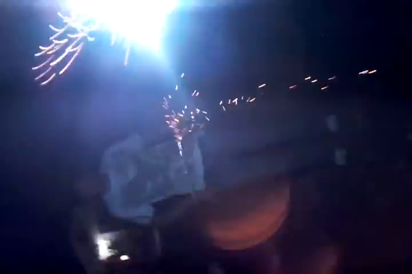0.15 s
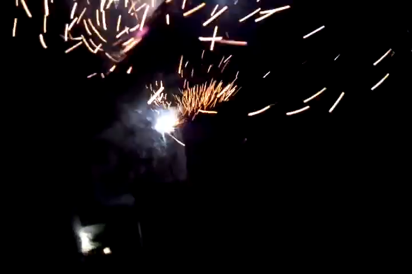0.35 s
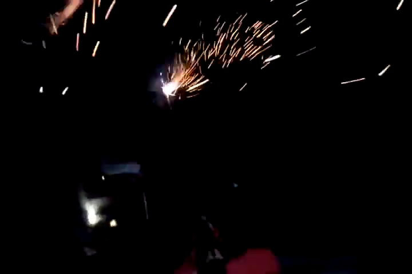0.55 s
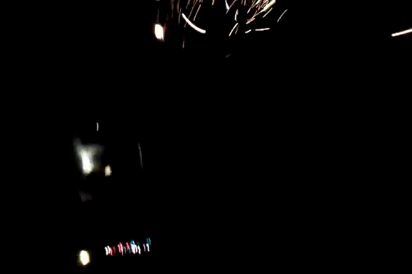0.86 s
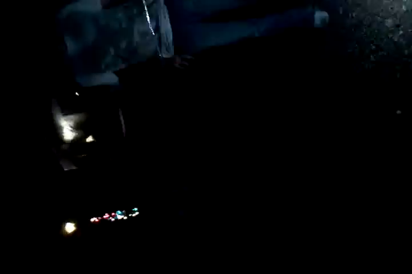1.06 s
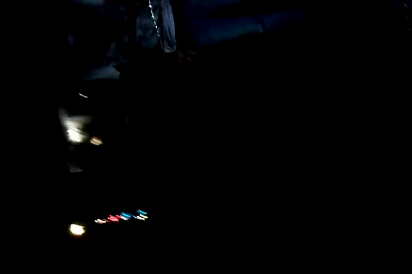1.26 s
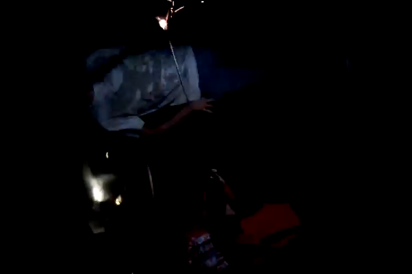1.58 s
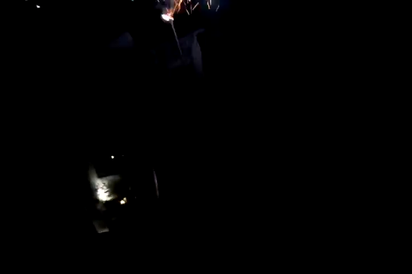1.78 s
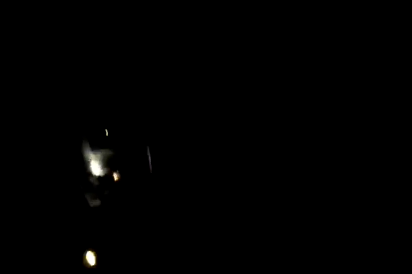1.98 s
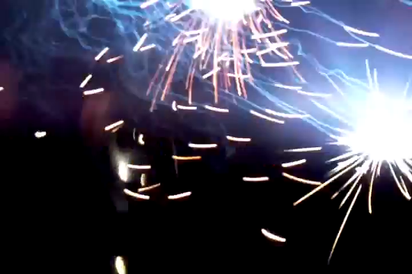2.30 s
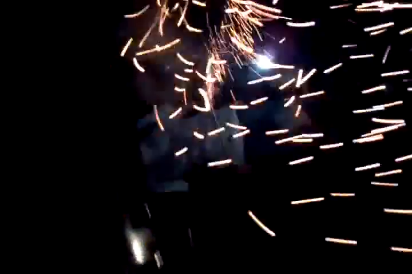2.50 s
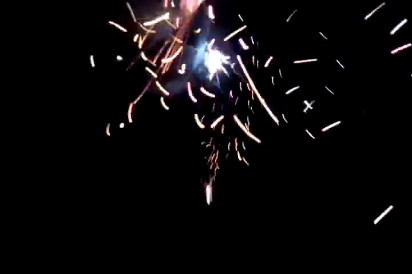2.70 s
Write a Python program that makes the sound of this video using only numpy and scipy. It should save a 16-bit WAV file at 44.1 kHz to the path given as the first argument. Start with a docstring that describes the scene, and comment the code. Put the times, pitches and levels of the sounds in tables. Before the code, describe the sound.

Small fireworks pop irregularly a few metres from a small band-limited microphone outdoors. A tight loud burst comes at 0.2-0.45 s, a strong bang at 0.57, a dense cluster at 0.7-0.95, then lighter snaps from 1.0 to 2.1. Louder cracks return at 2.15-2.3, the hardest at 2.38, then sparser pops, one strong at 2.64. Short spark sizzles and faint burning hiss and ticks continue underneath.

```python
"""An irregular crackle of small hand-held fireworks pops outdoors at night, a few metres from a small microphone.
Each pop is a pressure spike with a low thump, close reflections and a short scatter from things nearby.
Showers of sparks, made of coloured grains and noise, sizzle among the pops.
The burning stick hisses and ticks underneath, over a faint outdoor rumble of low noise."""
import sys
import numpy as np
from scipy import signal
from scipy.fft import rfft, irfft, next_fast_len
from scipy.io import wavfile
from scipy.ndimage import uniform_filter1d, map_coordinates

SR = 44100
rng = np.random.default_rng(int(sys.argv[2]) if len(sys.argv) > 2 else 0)


def wrap_up_sound(samples):
    """Save the sound to the file named by the first command line argument, as 16-bit audio."""
    columns = np.atleast_2d(samples).T
    # keep every value between -1 and 1, then stretch to whole-number steps
    tamed = np.clip(columns, -1, 1)
    steps = np.round(tamed * 32767).astype(np.int16)
    wavfile.write(sys.argv[1], SR, steps)


N = 125685


def amp(db):
    """Decibels to gain."""
    return 10 ** (np.asarray(db) / 20)


def unit(x):
    """Scale to rms 1."""
    return x / np.sqrt(np.mean(x ** 2) + 1e-20)


def unit_energy(x):
    """Scale to energy 1."""
    return x / (np.linalg.norm(x) + 1e-20)


def along(points, hz):
    """Interpolate (f/Hz, value) points on a log frequency axis."""
    f, value = np.transpose(points)
    return np.interp(np.log(hz + 1), np.log(f + 1), value)


def wobble(knots_per_s):
    """A smooth random curve through normally distributed knots."""
    knots = rng.standard_normal(int(N * knots_per_s / SR) + 4)
    return map_coordinates(knots, [np.arange(N) * knots_per_s / SR])


def coloured(x, points):
    """Filter x with the gains of (f/Hz, level/dB) points, leaving its phase alone."""
    m = next_fast_len(N + SR // 4)
    gain = amp(along(points, np.fft.rfftfreq(m, 1 / SR)))
    return irfft(rfft(x, m) * gain, m)[:N]


def resonance(f, hz, width):
    """Complex response of one resonance, 1 at its centre."""
    return 1j * f * width / (hz ** 2 - f ** 2 + 1j * f * width)


def causal(gain):
    """The spectrum of the sharpest causal pulse that has these gains (minimum phase)."""
    cepstrum = irfft(np.log(gain))
    half = len(cepstrum) // 2
    # fold the second half of the cepstrum onto the first
    cepstrum[1:half] *= 2
    cepstrum[half + 1:] = 0
    return np.exp(rfft(cepstrum))


def evened(spectrum, bins=61):
    """Reflections keep their fine ripple but add no broad colour."""
    power = uniform_filter1d(np.abs(spectrum) ** 2, bins)
    return spectrum / causal(np.sqrt(np.abs(power) + 1e-9))


def pulse(points, treble_db=0, body_db=0, size=2048):
    """A sharp pulse with this spectrum, its treble and body raised or lowered."""
    # how much of the treble setting each frequency takes: f/Hz, share [0-1]
    treble_shelf = [(2600, 0), (5000, 1)]
    # how much of the body setting each frequency takes: f/Hz, share [0-1]
    body_bell = [(380, 0), (600, 1), (950, 1), (1700, 0)]
    hz = np.fft.rfftfreq(size, 1 / SR)
    level_db = along(points, hz) + treble_db * along(treble_shelf, hz) + body_db * along(body_bell, hz)
    return irfft(causal(amp(level_db)))


def add(track, s, sound):
    """Mix a sound into the track at time s."""
    i = max(0, round(s * SR))
    part = track[i:i + len(sound)]
    part += sound[:len(part)]


def sparks(per_s, spread_db):
    """Random impulses of uneven size and either sign."""
    size = amp(spread_db * np.minimum(rng.exponential(size=N), 3))
    fires = rng.random(N) < per_s / SR
    return fires * size * rng.choice([-1, 1], N)


def scatter(size=2048):
    """Dense reflections from things nearby: a short flurry of noise with a weaker, longer tail."""
    rise_s, flurry_t60_s = 0.00042, 0.027
    tail_db, tail_t60_s = -16, 0.084  # from further away
    t = np.arange(size) / SR
    decay = amp(-60 * t / flurry_t60_s) + amp(tail_db - 60 * t / tail_t60_s)
    rise = 1 - np.exp(-t / rise_s)
    return unit_energy(rng.standard_normal(size) * rise * decay)


def night_air():
    """A faint outdoor rumble: steady noise with a low-frequency colour."""
    # colour of the rumble: f/Hz, level/dB
    rumble_colour = [(20, -5), (45, 4.5), (110, 3.5), (250, -8), (700, -32.5)]
    return amp(-70) * unit(coloured(rng.standard_normal(N), rumble_colour))


def burning():
    """The stick hisses unevenly and spits scattered ticks, both following one level curve."""
    # colour of hiss and ticks: f/Hz, level/dB
    hiss_colour = [(40, -18.5), (130, -0.5), (260, 3), (480, -2), (750, -1.5), (1100, -1.5), (2000, 2.5),
                   (2850, 1.5), (4500, -3), (6500, -2), (7200, -30.5), (9000, -61.5)]
    # level of hiss and ticks over time, with a brief dropout near 2.34 s: t/s, level/dB
    level_curve = [(0.0, -55), (0.31, -56), (0.44, -55.5), (0.65, -55), (0.75, -45), (0.98, -51.5),
                   (1.16, -55.5), (1.4, -53.5), (1.58, -53.5), (1.78, -57.5), (2.18, -54), (2.32, -48.5),
                   (2.339, -62), (2.358, -48.5), (2.53, -52.5), (2.85, -54.5)]
    hiss_db, waver_db, tick_db = -4.5, 2.1, -4.5  # hiss and ticks are set against the level curve
    hiss = unit(coloured(rng.standard_normal(N), hiss_colour))
    hiss *= amp(hiss_db + waver_db * wobble(knots_per_s=24.17))

    tick = scatter()
    tick[0] += 1  # the direct click
    ticks = signal.fftconvolve(sparks(per_s=260, spread_db=9), tick)[:N]
    ticks = amp(tick_db) * unit(coloured(ticks, hiss_colour))

    level_db = np.interp(np.arange(N) / SR, *np.transpose(level_curve))
    return amp(level_db) * (hiss + ticks)


def yard(x, count=12):
    """The outdoor echo: noise tails that die at a rate set by frequency, a new one for each stretch of pops."""
    # decay time of the echo: f/Hz, t60/s
    echo_t60 = [(100, 0.11), (1000, 0.055), (3000, 0.047), (8000, 0.042)]
    out = np.zeros(N)
    for part in np.array_split(np.arange(N), count):
        hz, t, bands = signal.stft(rng.standard_normal(SR // 2), SR, nperseg=256)
        decay = amp(-60 * t / along(echo_t60, hz)[:, None])
        tail = signal.istft(bands * decay, SR, nperseg=256)[1]
        add(out, part[0] / SR, signal.fftconvolve(x[part], unit_energy(tail)))
    return out


def showers():
    """Tiny spark impulses and noise, coloured, swell quickly, fade or grow for a while and then die."""
    # spark showers: start t/s, length/s, level before the envelope/dB, fade/(dB per s, negative grows), treble/dB
    shower_list = [(0.042, 0.0086, -42, 187, 15), (0.206, 0.022, -49, 99, -0.5),
                   (0.263, 0.061, -42.3, 63, -2), (0.327, 0.035, -38, 60, -8.5), (0.457, 0.04, -48, 87, -1),
                   (0.577, 0.057, -40.5, 56, -3.5), (0.693, 0.11, -53.5, -27, -9.5),
                   (0.827, 0.067, -42.5, 5, -2), (1.109, 0.027, -42, 15, -10), (1.139, 0.046, -46, 72, -4),
                   (1.35, 0.047, -50, 24, -6), (1.479, 0.006, -38.5, 107, -3), (1.5, 0.067, -57, 13, 1),
                   (1.646, 0.13, -51.5, 18, 0.5), (1.781, 0.13, -52.5, -3, 0.5),
                   (1.97, 0.0052, -34, 295, 3), (2.036, 0.034, -52.5, 13.5, -14),
                   (2.131, 0.029, -43.5, 11, 0), (2.196, 0.056, -46.5, 17, 1), (2.416, 0.1, -57.5, 29, 10),
                   (2.635, 0.073, -48, 23, 0), (2.72, 0.021, -50, -7, 1)]
    # colour of the sizzle: f/Hz, level/dB
    sizzle_colour = [(40, -7.5), (120, 2), (280, 2.5), (500, -3), (780, 0.5), (1200, -1), (2000, 0.5),
                     (2900, 4), (4500, -0.5), (6500, 1.5), (9000, -38.5)]
    attack_s, release_db_per_s, noise_share = 0.0052, 613, 0.75  # noise against grains of rms 1
    age = np.arange(SR // 4) / SR
    out = np.zeros(N)
    for s, length, db, fade, treble_db in shower_list:
        level_db = db - fade * np.minimum(age, length) - release_db_per_s * np.maximum(age - length, 0)
        grains = unit(sparks(per_s=1600, spread_db=3.5)[:len(age)])
        grains = grains + noise_share * rng.standard_normal(len(age))
        sizzle = unit(signal.fftconvolve(grains, pulse(sizzle_colour, treble_db))[:len(age)])
        swell = np.clip(age / attack_s, 0, 1)
        add(out, s, swell * amp(level_db) * sizzle)
    return out


def pop_paths(scatter_db, size):
    """Spectrum of a spike's routes: a weakened direct spike, near reflections and scatter."""
    direct_cut = 0.48
    near_count, near_max_s, near_gain = 4, 0.0016, 0.34  # off the hand and body
    spikes = np.zeros(size // 2)
    spikes[0] = 1 - direct_cut
    near = (rng.uniform(0.14, 1, size=near_count) * near_max_s * SR).astype(int)
    spikes[near] += near_gain * rng.choice([-1, 1], size=near_count)
    return evened(rfft(unit_energy(spikes) + amp(scatter_db) * scatter(), size))


def pops(crack_db=3.0, thump_db=-1.83, size=4096):
    """Each charge sends a reflected, scattered spike and a low thump, with its own body and hollow tone."""
    # the pops: t/s, crack level/dB, thump level/dB, body/dB, treble/dB, scatter over the spikes/dB,
    # hollow tone f/Hz; crack_db and thump_db are added to the two levels
    pop_list = [(0.0211, -18.5, -22, 5, 4, 16, 270), (0.0498, -11.5, -18, 1.5, -7, 4, 360),
                (0.208, -10, -20.5, 1, -5.5, 3, 310), (0.2666, -8.5, -12.5, 4.5, 1, 9, 790),
                (0.2814, -22, -18.5, 1, -8, -11, 750), (0.2847, -6.5, -6, 0, -20.5, 1.5, 750),
                (0.3066, -11, -29, -2, -22, 19, 320), (0.3354, -12.5, -15, 0, 7.5, 17.5, 140),
                (0.379, -17.5, -29, 4, -2.5, -7, 840), (0.4060, -35.5, -50, -1, 19, 14, 920),
                (0.4243, -19.5, -39.5, -7, -8, 3, 670), (0.4520, -13, -18, 1, -2, 6.5, 810),
                (0.572, -1.5, -7, -2.5, -4, -3.5, 211), (0.6742, -20.5, -52, 2, -1.5, 5, 1090),
                (0.6933, -25.5, -22, 0.5, -5, 9, 280), (0.7233, -12.5, -15.5, -4, -1.5, -4, 290),
                (0.751, -15, -19.5, 1, -15.5, -16, 290), (0.7571, -18.5, -44, -3, 4, 5, 160),
                (0.796, -13.5, -24, 3.5, -3.5, 1, 780), (0.815, -9, -18.5, 3, -4.5, -2, 200),
                (0.8243, -15.5, -5.5, 1, 1, -15, 140), (0.8260, -2.5, -20.5, 5.5, -1.5, -2, 140),
                (0.859, -18, -24, 4, -22, -3, 710), (0.8825, -13, -12.5, 1.5, -26, -6, 720),
                (0.9098, -7, -10.5, -1.5, -2.5, 6, 410), (0.9547, -15, -42, -9, 8, -2.5, 290),
                (1.017, -14.5, -39, -3, 1, 7, 690), (1.0888, -18, -25, 4, -7.5, -9.5, 140),
                (1.0903, -10.5, -19.5, -1.5, -4, 6, 160), (1.1077, -7, -15, -9, -9, 11, 200),
                (1.1244, -14, -33, -10, -5, -7, 950), (1.1513, -13, -18.5, -12, -19, -7, 280),
                (1.166, -18, -26, 1, -19, -5, 560), (1.3481, -10, -18, 0.5, -3, 1.5, 290),
                (1.3805, -21.5, -31, 5, -9, 10, 780), (1.4143, -22.5, -30, 10.5, -28, -7, 880),
                (1.4402, -20, -48, -6, -7, 0, 220), (1.454, -19, -49, -7, -8.5, 4, 1030),
                (1.4809, -12.5, -19.5, -2.5, -1.5, -4.5, 200), (1.4903, -12.5, -22, -0.5, -1, 2, 1010),
                (1.517, -22, -26, 4, -16, 4, 270), (1.5317, -19, -24, 6, 2, 3.5, 270),
                (1.546, -16.5, -22.5, 5, -9, -12, 270), (1.68, -16.5, -32.5, -9, 0.5, 4, 430),
                (1.6956, -18, -19.5, -6, -2.5, 12, 240), (1.7264, -12, -43, -2.5, 0.5, 5, 970),
                (1.792, -15, -21.5, -0.5, -4, -3, 1000), (1.8161, -21.5, -40, -1, 12.5, 4, 1120),
                (1.8220, -13, -38, -0.5, -3, -1, 1140), (1.8497, -13.5, -20, 1, -10, 7.5, 240),
                (1.8879, -20, -29, 0, -13, -5, 840), (1.9196, -16, -34, -2, 1.5, -1, 880),
                (1.9452, -13.5, -23.5, 0, -6, 7.5, 320), (1.977, -9, -23, -0.5, -10.5, -4, 655),
                (1.9792, -9, -12, 2, -3.5, -3, 154), (2.038, -33.5, -24.5, -2.5, 9.5, 15, 430),
                (2.099, -23, -28, 1, 7, 0, 400), (2.1465, -13, -48, 1, -12.5, 5, 140),
                (2.152, -8, -15, 4, -7, 2.5, 140), (2.1704, -11.5, -18, 4.5, -0.5, -1.5, 170),
                (2.1754, -15.5, -32, -1, -1.5, 0, 140), (2.2145, -4.5, -10, -2, -5.5, -10.5, 300),
                (2.241, -6.5, -24, -3.5, -1, 6, 150), (2.2427, -8.5, -8.5, 2.5, 1.5, -1, 150),
                (2.2775, -6.5, -6.5, 1.5, 2.5, -2, 980), (2.2829, -24.5, -23.5, -10, 14, -3.5, 140),
                (2.3092, -20.5, -47, 2, -13, -2, 990), (2.3763, -13.5, -7.5, 2.5, 9.5, 11.5, 430),
                (2.3812, 0.5, -5, 0, -5, -10, 300), (2.4302, -16.5, -23.5, 1, 7.5, 5, 300),
                (2.448, -23.5, -26, 0, -4, 9, 480), (2.476, -12.5, -20.5, 0.5, 1.5, -4, 1000),
                (2.5262, -21.5, -29, 1, 6.5, 8, 990), (2.5339, -12.5, -38, -7, 1.5, -3, 355),
                (2.6068, -17, -24, -1, -6.5, -1, 300), (2.6302, -20, -32.5, 1.5, 10, 16, 400),
                (2.6375, -6.5, -9.5, -3, 4.5, -9.5, 370), (2.7476, -13, -23, 4.5, 5, -1, 150),
                (2.7847, -20, -38, 3.5, 3.5, -8, 690)]
    # colour of the crack: f/Hz, level/dB
    crack_colour = [(60, -42), (200, -10.5), (500, -2), (800, -7), (1300, -1.5), (2000, 1), (2750, 2),
                    (3400, 0.5), (5000, -6), (7000, -2.5), (9000, -2)]
    # colour of the thump: f/Hz, level/dB
    thump_colour = [(30, -22), (60, -8), (120, 2), (170, 1), (320, 1), (500, -8.5), (900, -7.5),
                    (2500, -23)]
    out, f = np.zeros(N), np.fft.rfftfreq(size, 1 / SR)
    crack_norm = np.linalg.norm(pulse(crack_colour))
    thump_norm = np.linalg.norm(pulse(thump_colour))
    for s, level_db, low_db, body_db, treble_db, scatter_db, hollow_hz in pop_list:
        paths = pop_paths(scatter_db, size)
        crack = paths * rfft(pulse(crack_colour, treble_db, body_db), size) / crack_norm
        thump = rfft(pulse(thump_colour, 0, body_db), size) / thump_norm
        pop = amp(level_db + crack_db) * crack + amp(low_db + thump_db) * thump
        hollow = 1 + resonance(f, hollow_hz, width=84)  # a resonance 84 Hz wide, narrow at the higher tones
        add(out, s, -irfft(pop * hollow))
    return out


def scene():
    """Pops with their echo, spark showers, the burning stick and the night air."""
    bangs = pops()
    echo = amp(-21) * yard(bangs)
    return (bangs + echo + showers() + burning() + night_air())[None]


def record(dry):
    """The small microphone rings a little, smears and rounds off spikes, and keeps nothing above its band limit."""
    # resonances of the microphone's case: f/Hz, width/Hz, gain [linear]
    case_modes = [(740, 110, 0.31), (2830, 370, 0.21)]
    # roll-off at the top of the band: f/Hz, level/dB
    top_edge = [(6900, 0), (7600, 0.5), (8300, -10), (9000, -33)]
    top_hz, overload_db = 9070, -8
    port_hz, port_q = 3300, 2.2
    m = next_fast_len(N + SR // 4)
    f = np.fft.rfftfreq(m, 1 / SR)
    in_band = f < top_hz
    case = 1 + sum(gain * resonance(f, hz, width) for hz, width, gain in case_modes)
    # the port is an all-pass: it delays the band around port_hz and so smears each spike
    port = port_hz ** 2 - f ** 2 + 1j * f * port_hz / port_q
    smear = np.conj(port) / port
    x = irfft(rfft(dry[0], m) * case * smear * in_band, m)[:N]
    x = x / (1 + (x / amp(overload_db)) ** 4) ** .25  # soft overload
    return irfft(rfft(coloured(x, top_edge), m) * in_band, m)[None, :N]


dry = scene()
out = record(dry)
wrap_up_sound(out)
```